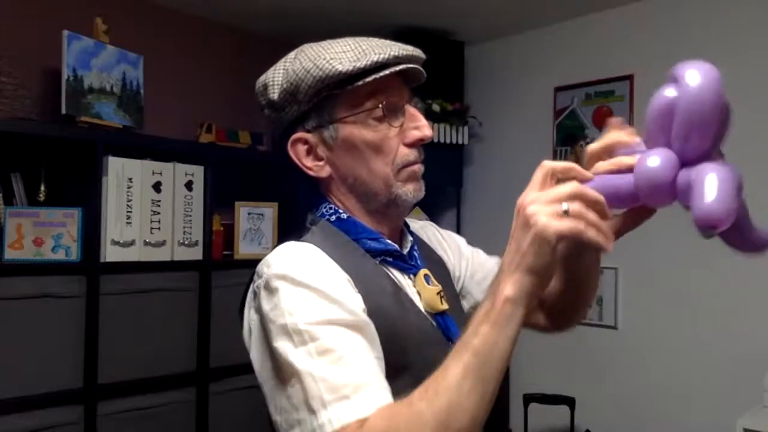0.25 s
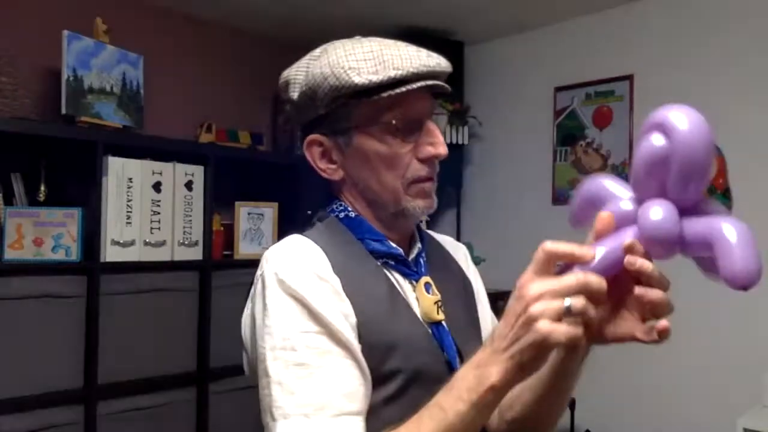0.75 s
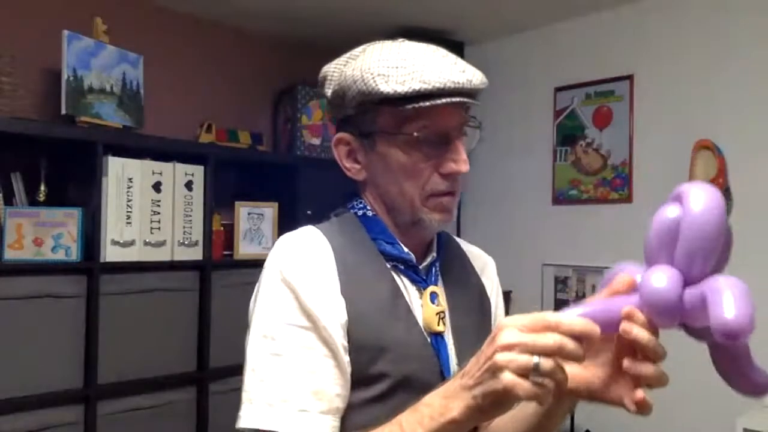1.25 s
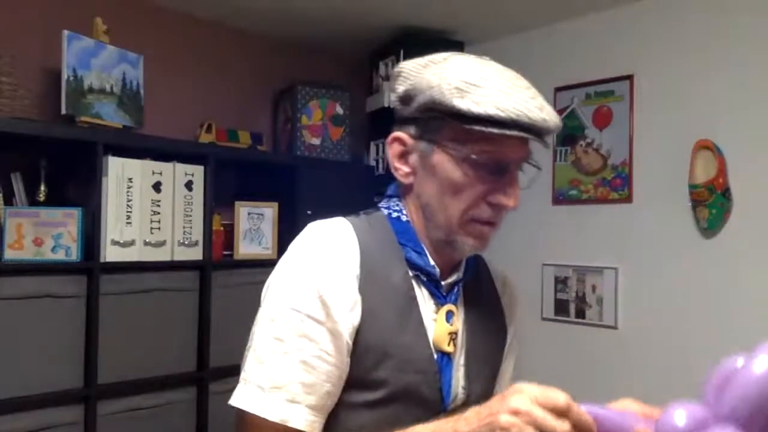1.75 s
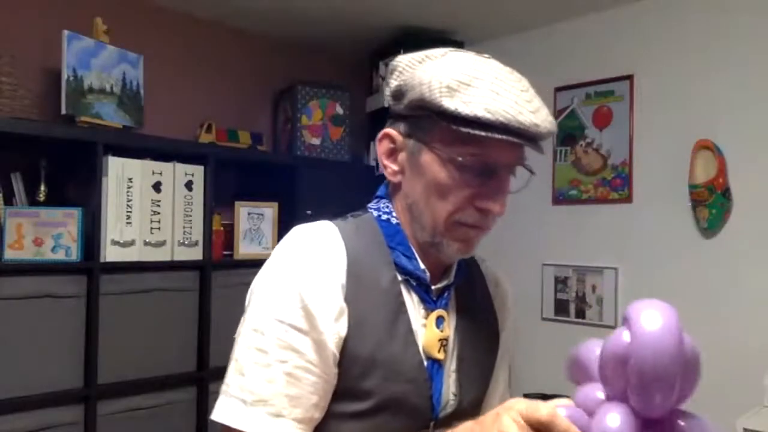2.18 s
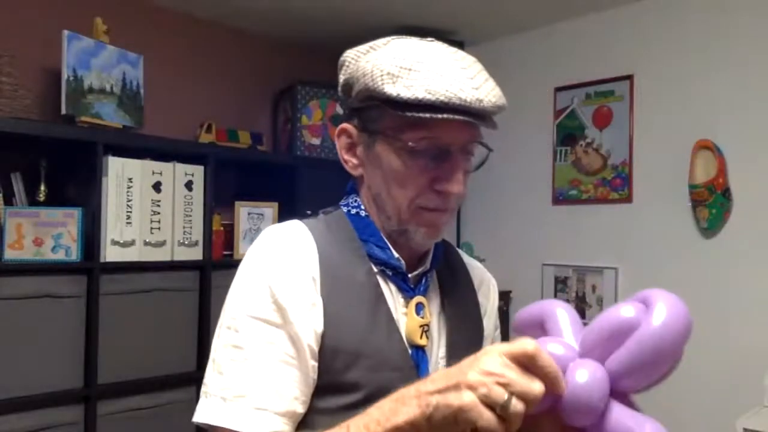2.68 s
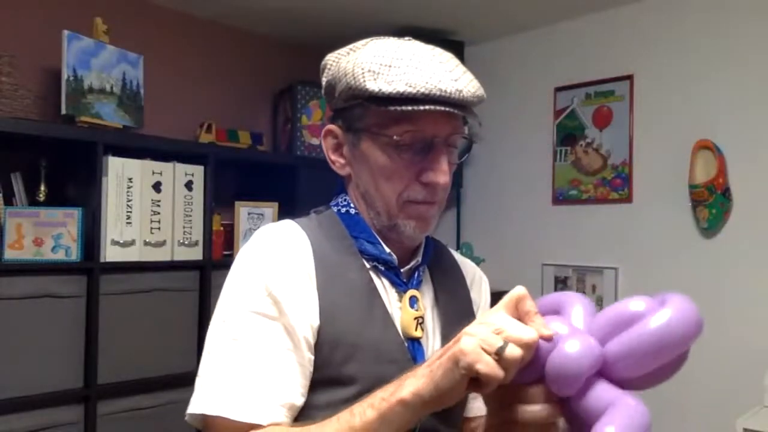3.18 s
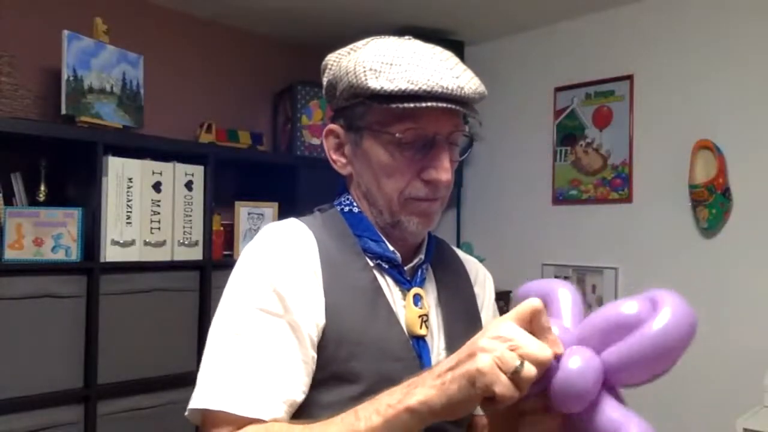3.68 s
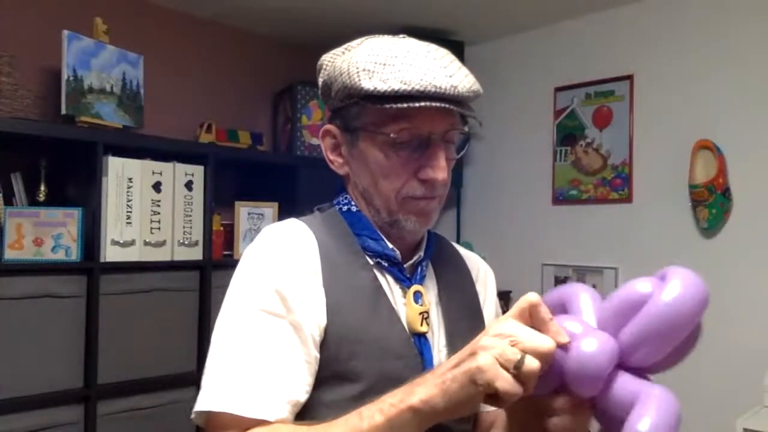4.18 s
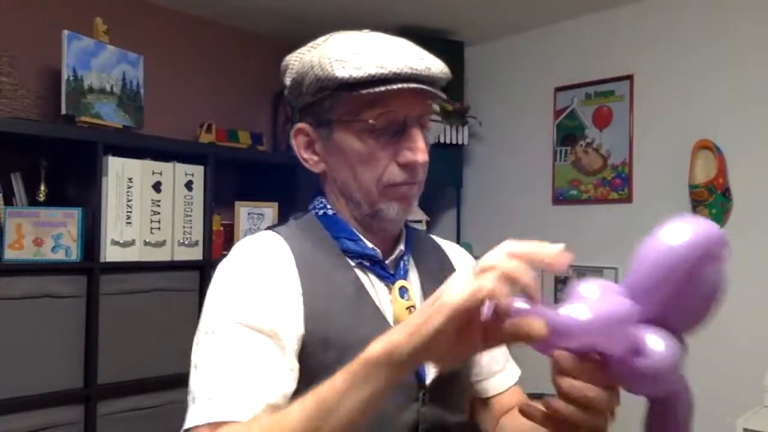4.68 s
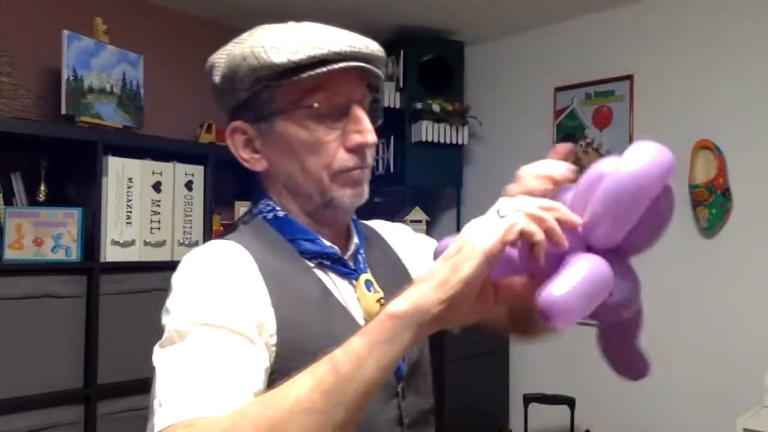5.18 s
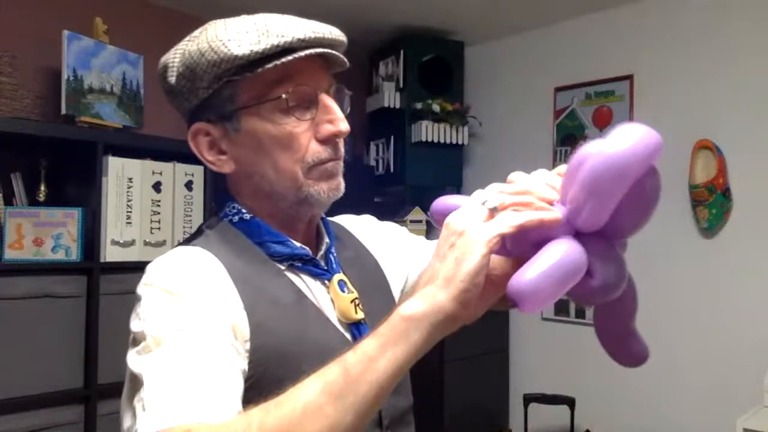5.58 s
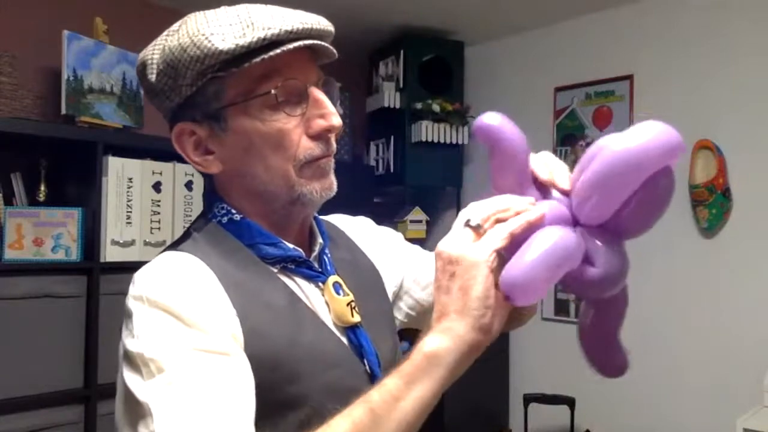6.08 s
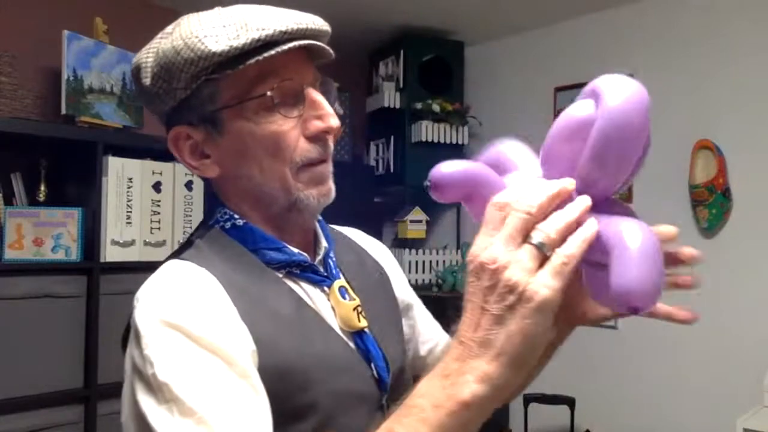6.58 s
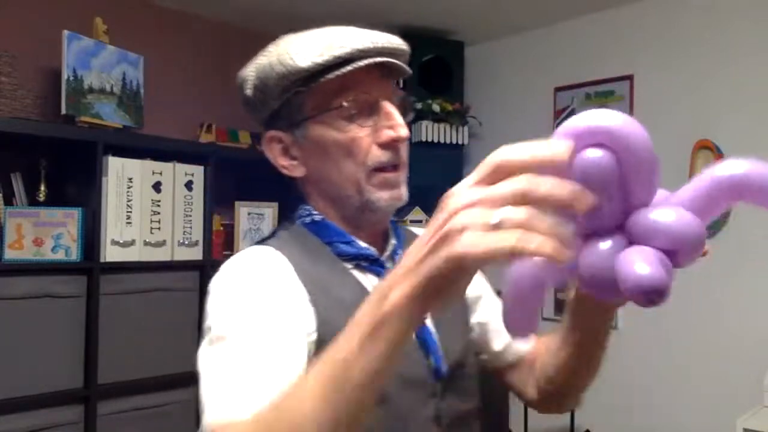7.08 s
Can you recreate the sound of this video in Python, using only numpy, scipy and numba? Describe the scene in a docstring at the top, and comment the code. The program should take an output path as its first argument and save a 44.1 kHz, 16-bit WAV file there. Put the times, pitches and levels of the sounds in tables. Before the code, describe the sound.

Twisted latex balloons squeak and creak in dense, scratchy bursts under gripping hands, with sharp snaps and brief quiet gaps in a small room.

```python
"""In a small room, twisted latex balloons are squeezed and rubbed by hand close to a camera microphone.
The rubber sticks and slips in dense uneven bursts that ring the taut skins and the air inside.
Single grips let go with a snap: a sharp burst of noise. Now and then a bubble rings hollow: a short,
unsteady note. The walls answer softly over a faint room tone. The camera turns quiet bands down and
clips softly; both channels carry the same sound."""
import sys
import numpy as np
from scipy import signal
from scipy.fft import rfft, irfft, next_fast_len
from scipy.io import wavfile
from scipy.ndimage import uniform_filter1d, map_coordinates
from numba import njit

SR = 44100
rng = np.random.default_rng(int(sys.argv[2]) if len(sys.argv) > 2 else 0)


def digitize_waveform(pressure):
    """Quantize a signal to 16-bit integers and store it at the path in sys.argv[1].

    Rows of a 2-D input are taken as channels; values are limited to [-1, 1].
    """
    field = np.atleast_2d(pressure).T
    bounded = np.clip(field, -1, 1)
    quanta = np.round(bounded * 32767).astype(np.int16)
    wavfile.write(sys.argv[1], SR, quanta)


N = 323895

# treble of slips and snaps: (frequency [Hz], level per Hz [dB])
FIZZ = [(4000, -34), (6800, -7), (7680, -12), (8250, -9.5), (9220, -2.5), (12600, 1.5), (15000, 3.5),
        (16000, -9.5)]


def amp(db):
    """Gain of a level in dB."""
    return 10 ** (np.asarray(db) / 20)


def unit(x):
    """Scaled to rms 1."""
    return x / np.sqrt(np.mean(x ** 2) + 1e-20)


def levelled(x):
    """x held near rms 1 over an eighth of a second, so that the stroke alone sets the loudness."""
    power = np.abs(uniform_filter1d(x ** 2, SR // 8))
    return x / np.sqrt(power + 1e-20)


def along(points, hz):
    """Values read between (frequency, value) points on a log frequency axis."""
    f, v = np.transpose(points)
    return np.interp(np.log(hz + 1), np.log(f + 1), v)


def wobble(rate):
    """A smooth random curve with rate random points a second."""
    knots = rng.standard_normal(int(N * rate / SR) + 4)
    return map_coordinates(knots, [np.arange(N) * rate / SR])


def filtered(x, response):
    """x times a complex response of frequency."""
    m = next_fast_len(N + 8192)
    return irfft(rfft(x, m) * response(np.fft.rfftfreq(m, 1 / SR)), m)[..., :N]


def coloured(x, points):
    """x through a filter with this spectrum and energy 1, which never sounds ahead of its input."""
    gain = amp(along(points, np.fft.rfftfreq(2048, 1 / SR)))
    cepstrum = irfft(np.log(gain + 1e-6))
    # folding the second half onto the first makes the filter minimum-phase
    cepstrum[1:1024] *= 2
    cepstrum[1025:] = 0
    h = irfft(np.exp(rfft(cepstrum)))
    return signal.fftconvolve(x, h / np.linalg.norm(h))[:N]


def steep(x, low_hz, high_hz):
    """A causal band-pass: each part of the sound speaks only in its own range."""
    band = signal.butter(3, [low_hz, high_hz], "bandpass", fs=SR, output="sos")
    return signal.sosfilt(band, x)


def strokes():
    """Every rub swells, holds and lets go; overlapping rubs add power, and the strongest lead each pitch."""
    # rubs: (full grip [s], attack [s], hold [s], release [s], squeak [dB], creak [dB], drum [dB],
    # chirp [dB], scratch [dB], taut twist [Hz], long bubble [Hz], enclosed air [Hz])
    rubs = [(0.021, 0.2, 0.022, 0.07, -23, -29, -36, -33, -28.5, 2410, 890, 371),
            (0.131, 0.025, 0.013, 0.056, -36.5, -59.5, -48, -63, -50, 2960, 1120, 304),
            (0.219, 0.03, 0.012, 0.1, -27, -34.5, -82, -31, -38, 2600, 1385, 484),
            (0.278, 0.068, 0.076, 0.033, -20.5, -28, -38.5, -29.0, -25, 2810, 1350, 560),
            (0.333, 0.21, 0.036, 0.054, -30.5, -34, -33.5, -32.5, -82, 2930, 1580, 588),
            (0.637, 0.055, 0.06, 0.094, -35.5, -39.5, -38.5, -36, -31.5, 2660, 1360, 512),
            (0.628, 0.036, 0.049, 0.058, -28, -38.5, -78.0, -77.5, -73.0, 2610, 1370, 480),
            (0.77, 0.013, 0.06, 0.056, -23.5, -29, -53, -32.5, -30, 2400, 1015, 584),
            (0.917, 0.055, 0.01, 0.1, -14, -20.5, -29.5, -23, -20, 2430, 1156, 520),
            (0.996, 0.14, 0.0068, 0.074, -24, -25.5, -32.5, -27.5, -27, 2590, 1175, 520),
            (1.059, 0.058, 0.048, 0.216, -25, -31.5, -37, -30.5, -31, 2680, 1174, 630),
            (1.145, 0.083, 0, 0.095, -27, -23, -30, -36.5, -27.5, 3010, 1060, 610),
            (1.227, 0.22, 0.033, 0.035, -31.5, -39, -40, -35, -34.5, 3330, 1130, 308),
            (1.244, 0.025, 0.04, 0.029, -37, -55, -40.5, -43.0, -77, 3000, 1090, 280),
            (1.365, 0.005, 0.0043, 0.042, -26.5, -80.0, -40.5, -26.5, -35, 3030, 1160, 270),
            (1.431, 0.14, 0.001, 0.13, -23, -29.5, -34.5, -28.5, -28, 3130, 1030, 596),
            (1.546, 0.104, 0.02, 0.02, -28.0, -32.5, -79, -36.0, -40, 3020, 923, 480),
            (1.603, 0.012, 0.0072, 0.086, -18.5, -21.5, -25, -25, -20, 3130, 1244, 530),
            (1.624, 0.28, 0, 0.32, -28.5, -27.5, -37.5, -32.5, -39, 2870, 1110, 590),
            (1.698, 0.109, 0.0086, 0.085, -24.5, -29.0, -29, -32, -24, 2670, 1326, 286),
            (1.84, 0.33, 0.105, 0.083, -39, -79.5, -39, -32.5, -53, 3010, 1160, 358),
            (1.885, 0.098, 0.052, 0.28, -18, -21.5, -31.5, -23, -19.5, 2600, 963, 408),
            (2.076, 0.03, 0.009, 0.02, -25.5, -80.0, -46.5, -23, -20.5, 3040, 1160, 480),
            (2.082, 0.033, 0.11, 0.32, -27.5, -30, -37, -29.5, -25, 2680, 1086, 270),
            (2.398, 0.5, 0.033, 0.039, -28, -33.5, -36.5, -28.5, -23.5, 2630, 1255, 300),
            (2.482, 0.5, 0.023, 0.02, -39.5, -44, -80.0, -49, -54, 2200, 988, 480),
            (2.531, 0.01, 0.008, 0.19, -25, -80.0, -48, -28.5, -15.5, 2950, 1160, 430),
            (2.54, 0.032, 0.094, 0.156, -23.5, -31.5, -53, -25.5, -44, 3100, 1155, 463),
            (2.672, 0.007, 0.01, 0.053, -26.0, -31, -78.5, -28, -34.0, 2320, 1354, 480),
            (2.714, 0.013, 0.0018, 0.058, -15.0, -27.5, -78.5, -48, -21.5, 3110, 1275, 480),
            (2.748, 0.057, 0.033, 0.099, -7, -20, -37.5, -14, -11, 3000, 1227, 530),
            (2.864, 0.14, 0.13, 0.067, -25.5, -26.5, -45.5, -32, -43.5, 2640, 1370, 338),
            (2.972, 0.048, 0.011, 0.057, -26, -29.5, -53, -25, -27, 2690, 1280, 480),
            (3.088, 0.029, 0.055, 0.02, -66.5, -80.0, -74, -66.5, -44, 2660, 1160, 340),
            (3.135, 0.029, 0.019, 0.04, -27.0, -35.0, -40.5, -36.5, -32.5, 2380, 1492, 350),
            (3.253, 0.083, 0.027, 0.062, -45, -39, -74, -57, -46.5, 2750, 1410, 600),
            (3.363, 0.048, 0.01, 0.038, -44.5, -46, -59.5, -53.5, -36.0, 2250, 1458, 270),
            (3.478, 0.054, 0.022, 0.05, -31.0, -31.5, -44.5, -34, -27.5, 1980, 1290, 506),
            (3.567, 0.083, 0.009, 0.056, -29.0, -31, -47.5, -48, -32, 1940, 1450, 350),
            (3.651, 0.025, 0.029, 0.035, -29.5, -38, -73.5, -36, -30, 2840, 1400, 480),
            (3.709, 0.005, 0.0055, 0.026, -42.0, -80.0, -78, -41, -28, 2930, 1160, 480),
            (3.731, 0.091, 0.00071, 0.042, -30.5, -45.5, -61.5, -48, -36.5, 2030, 1480, 350),
            (3.754, 0.059, 0.0015, 0.061, -45.5, -54.0, -52, -56, -80.0, 2090, 1450, 280),
            (3.817, 0.024, 0.009, 0.02, -34.5, -54, -67, -41, -29, 3340, 1524, 410),
            (3.856, 0.037, 0.012, 0.023, -28.5, -47.5, -55, -28, -22, 2710, 1408, 400),
            (3.86, 0.005, 0.031, 0.094, -22.5, -28, -40.5, -31.0, -18, 2130, 1470, 330),
            (3.929, 0.012, 0.11, 0.17, -24.5, -26, -49.5, -30.5, -28, 2170, 1415, 646),
            (3.95, 0.01, 0.015, 0.069, -15, -22.5, -32, -17.5, -7, 2650, 1020, 360),
            (4.101, 0.02, 0.022, 0.029, -24.5, -31, -61, -31.5, -26.5, 2280, 1337, 430),
            (4.174, 0.0099, 0.00064, 0.056, -14, -26, -71, -21.5, -22.5, 3340, 1512, 420),
            (4.276, 0.039, 0.092, 0.03, -18, -20.0, -49, -21.5, -19, 2720, 1220, 318),
            (4.335, 0.061, 0.096, 0.067, -24.5, -26, -32.5, -46, -50, 2850, 1188, 540),
            (4.417, 0.028, 0.049, 0.077, -80.0, -33.5, -41, -80.0, -54, 2830, 1010, 510),
            (4.586, 0.6, 0.034, 0.11, -59, -64, -65.5, -62.5, -58.5, 2670, 1122, 569),
            (4.783, 0.027, 0.054, 0.037, -61, -80.0, -50.5, -64.5, -53.5, 2820, 1160, 191),
            (4.869, 0.11, 0.098, 0.02, -52, -78.5, -41.5, -78.0, -78.5, 2730, 1160, 370),
            (4.88, 0.018, 0.01, 0.047, -27.5, -28, -32.5, -40, -29.5, 3100, 900, 450),
            (4.911, 0.085, 0.07, 0.06, -38.5, -38.5, -46, -44.0, -40.5, 3430, 1010, 390),
            (4.922, 0.041, 0, 0.056, -23, -27.5, -26.0, -30.5, -24.5, 2870, 1460, 350),
            (5.283, 0.041, 0.0068, 0.12, -37, -38.5, -39, -47.0, -37.5, 2340, 1200, 170),
            (5.382, 0.0059, 0.056, 0.094, -25.0, -30, -30.5, -29, -24.5, 2720, 1075, 588),
            (5.572, 0.2, 0.061, 0.02, -35, -38.0, -40, -40.5, -33.5, 2400, 1100, 500),
            (5.635, 0.013, 0.0059, 0.11, -33.5, -39, -35, -42, -29, 2420, 1030, 384),
            (5.694, 0.096, 0.013, 0.094, -32, -34.5, -34.5, -37.5, -30.5, 2680, 1100, 590),
            (5.748, 0.046, 0.01, 0.11, -33, -36.5, -36, -37.0, -28, 2310, 1120, 312),
            (5.824, 0.076, 0.0, 0.38, -27.0, -29.0, -27.5, -33, -25, 2480, 1140, 282),
            (6.052, 0.29, 0.009, 0.14, -19.5, -26, -28, -26, -19, 2480, 1277, 428),
            (6.178, 0.14, 0.1, 0.076, -21.5, -27.5, -28.5, -27.5, -19.5, 2640, 1280, 326),
            (6.31, 0.027, 0.075, 0.081, -45.5, -46.5, -52, -54, -81, 2860, 1110, 320),
            (6.486, 0.096, 0.009, 0.059, -49, -47.5, -52, -59, -50, 2380, 1124, 300),
            (6.562, 0.005, 0.033, 0.123, -62, -72, -77, -71, -62, 2010, 1535, 477),
            (6.622, 0.006, 0.0011, 0.044, -74, -74.0, -78.0, -53.5, -51.5, 2830, 1290, 480),
            (6.803, 0.03, 0.027, 0.02, -64, -67.5, -78, -80.0, -58, 2450, 1070, 476),
            (6.862, 0.021, 0.0, 0.087, -27.0, -27.5, -34, -33.5, -29.0, 2350, 1400, 560),
            (6.964, 0.026, 0.09, 0.043, -44, -52.5, -59, -42, -49.0, 2510, 1460, 600),
            (6.98, 0.047, 0.021, 0.065, -39, -46, -50.5, -45, -37.0, 2350, 1360, 560),
            (7.142, 0.021, 0.052, 0.048, -48.5, -64.5, -69, -61.5, -67, 2090, 1590, 596),
            (7.19, 0.0067, 0.0, 0.61, -46.5, -55, -44, -66.0, -53, 2100, 1470, 336),
            (7.237, 0.019, 0.037, 0.084, -35, -42, -45, -41.5, -35.0, 2780, 1330, 330),
            (7.3, 0.028, 0.009, 0.15, -34, -33, -49, -45.0, -34.5, 1990, 990, 503)]
    # how fast the pitches sag as a rub goes on: twist, bubble, air [octaves per second]
    sag = [0.36, 0.71, 0.22]
    swing_db = 30  # gained over an attack time, lost over a release time
    steps_per_s = 500
    air_lag_s = 0.0049  # the enclosed air answers late

    t = np.arange(0, N / SR + .1, 1 / steps_per_s)
    rows = np.array(rubs)[:, :, None]
    grip, hold = rows[:, 0], np.abs(rows[:, 2])
    attack, release = np.abs(rows[:, 1]) + 1e-3, np.abs(rows[:, 3]) + 1e-3

    # how far each rub lies below its full level at each moment
    away = np.maximum((grip - t) / attack, (t - grip - hold) / release)
    under_db = swing_db * np.clip(away, 0, 8)
    power = amp(2 * (rows[:, 4:9] - under_db[:, None]))

    since_grip = np.clip(t - grip, -.2, .3)[:, None]
    sagged = rows[:, 9:] * 2 ** (-np.c_[sag] * since_grip)
    # squared power lets the strongest rub lead the squeak, creak and drum pitches
    weight = power[:, :3] ** 2
    twist_hz, bubble_hz, air_hz = (weight * sagged).sum(0) / weight.sum(0)

    squeak, creak, drum, chirp, scratch = np.sqrt(power.sum(0))
    now = np.arange(N) / SR
    soon = lambda curve: np.interp(now, t, curve)
    late = lambda curve: np.interp(now - air_lag_s, t, curve)
    return (soon(squeak), soon(creak), late(drum), soon(chirp), soon(scratch),
            soon(twist_hz), soon(bubble_hz), late(air_hz))


def slips(rate, spread_db, hiss):
    """Uneven stick-slip jerks, a few far larger than the rest, over sliding hiss."""
    passed = np.cumsum(rate * amp(4 * wobble(25))) / SR
    when = np.flatnonzero(np.diff(np.floor(passed)))  # one jerk at each whole count
    size = amp(spread_db * np.minimum(rng.exponential(size=N), 4))
    direction = rng.choice([-1, 1], N)
    jerks = np.zeros(N)
    jerks[when] = size[when] * direction[when]
    share = np.clip(hiss, 0, 1)  # of the power
    return np.sqrt(1 - share) * unit(jerks) + np.sqrt(share) * rng.standard_normal(N)


def ringing(force, modes, shift_db, favour_db=lambda hz: 0):
    """The grip wanders over the rubber, so each mode is driven now harder, now softer."""
    ring = np.zeros(N)
    for k, (hz, width, db) in enumerate(modes):
        drive = force * amp(db + shift_db * wobble(14) + favour_db(hz))
        b, a = signal.iirpeak(hz, hz / width, SR)
        ring += (-1) ** k * signal.lfilter(b, a, drive)
    return levelled(ring)


@njit
def resonate(force, turn, radius):
    """A two-pole resonance whose pitch (radians a sample) moves."""
    out = np.zeros(len(force))
    for i in range(2, len(force)):
        push = force[i] - force[i - 2]
        out[i] = push + 2 * radius[i] * np.cos(turn[i]) * out[i - 1] - radius[i] ** 2 * out[i - 2]
    return out


def gliding(force, hz, sharpness):
    """Squeezing stretches the rubber: the resonance follows the tension."""
    turn = 2 * np.pi * hz / SR
    radius = np.exp(-np.pi * hz / sharpness / SR)
    return levelled(resonate(force, turn, radius))


def rubbing():
    """One train of slips drives skins, necks, bubbles, enclosed air and the dry treble scratch."""
    # skins of the twists: (frequency [Hz], width [Hz], drive [dB])
    skin_modes = [(1710, 100, 4.5), (1830, 63, 11.5), (2094, 110, -5.5), (2308, 140, 4), (2328, 100, 2),
                  (2653, 180, 2.5), (2900, 58, -7), (2985, 140, -1), (3130, 110, -2.5), (3488, 78, 3.5),
                  (3630, 92, 1.5), (3833, 100, -2)]
    # pinched necks: (frequency [Hz], width [Hz], drive [dB])
    neck_modes = [(4306, 560, 0.5), (4826, 220, 4.5), (5270, 300, 1), (5890, 460, 0), (6180, 330, -2)]
    *gains, taut_hz, bubble_hz, air_hz = strokes()
    force = slips(900, spread_db=4.5, hiss=0.42)  # about 900 slips a second

    # skin modes near the taut twist's pitch lead
    near = lambda hz: -9 * np.minimum(np.abs(np.log2(hz / taut_hz)), 1.5)
    skins = ringing(force, skin_modes, 7, near)
    twist = gliding(force, taut_hz, 2.4)
    squeak = levelled(steep(skins + amp(0.5) * twist, 1700, 4200))

    necks = ringing(force, neck_modes, 3.4)
    chirp = levelled(steep(necks + amp(-4.5) * force, 3900, 6300))

    bubble = gliding(force, bubble_hz, 5.7)
    # two broad resonances in a row fill in above the bubble's pitch
    upper = gliding(gliding(force, 1.13 * bubble_hz, 0.99), 1.15 * bubble_hz, 0.8)
    creak = levelled(steep(bubble + amp(-3.5) * upper, 770, 1700))

    air = gliding(force, air_hz, 11)
    broad_air = gliding(force, air_hz, 0.81)
    drum = levelled(steep(air + amp(2.5) * broad_air, 100, 940))

    scratch = coloured(force * amp(2.72 * wobble(60)), FIZZ)
    parts = (squeak, creak, drum, chirp, scratch)
    return sum(gain * part for gain, part in zip(gains, parts))


def hollow():
    """A bubble rings on its own: short notes of wandering strength and phase that swell and fade."""
    # hollow notes: (start [s], length [s], level [dB], pitch [Hz])
    bubble_notes = [(0.01, 0.061, -34.5, 866), (0.039, .06, -42, 359), (0.11, .07, -48.5, 350),
                    (0.328, 0.071, -37, 334), (0.677, .06, -39, 310.6), (0.766, 0.065, -31.5, 1002),
                    (0.924, 0.049, -28, 510), (1.1, 0.056, -26, 1028), (1.243, 0.073, -38.5, 274),
                    (1.346, 0.046, -40.5, 275), (1.406, .05, -32, 1024), (1.585, .05, -33, 520),
                    (1.68, .06, -43, 250), (1.873, 0.096, -29, 950), (2.08, 0.12, -39, 270),
                    (2.859, 0.062, -48, 190), (3.109, 0.074, -40, 348.5), (3.72, .08, -54, 285),
                    (4.39, 0.084, -38, 502.7), (4.908, 0.037, -36.5, 350), (5.254, 0.065, -42.5, 163.4),
                    (5.409, .04, -37, 590)]
    wavers_hz = 60  # random points a second in the wandering
    t, notes = np.arange(N) / SR, np.zeros(N)
    unsteady = 1 + 1.1 * (wobble(wavers_hz) + 1j * wobble(wavers_hz))
    for s, length, db, hz in bubble_notes:
        on = slice(round(s * SR), round((s + length) * SR))
        swell = np.sin(np.pi * (t[on] - s) / length)
        tone = np.real(unsteady[on] * np.exp(2j * np.pi * hz * t[on]))
        notes[on] += np.sqrt(2) * amp(db) * swell * tone
    return notes


def snaps():
    """Each release is a sharp jerk and a moment of tearing, with a low thump that is stronger with its treble."""
    # grips that let go: (time [s], level before a common 15 dB cut [dB], treble against the body [dB])
    releases = [(0.1656, -34, -8), (0.5964, -38.5, 5.5), (0.6272, -22.5, -14), (0.7669, -19, -8.5),
                (0.7702, -17.5, -7), (0.7754, -15.5, -5), (0.7871, -17, -12), (0.7974, -12, -12),
                (0.8143, -14.5, -9), (0.8252, -15.5, -9), (0.8308, -12, -9), (0.8686, -14.5, -14.5),
                (0.8937, -4, -15.5), (0.9025, -8, -10), (0.913, -6, -10), (1.053, -18, -6),
                (1.2776, -26.5, -15.5), (1.3981, -13, -11), (1.4091, -12, -10), (1.4195, -7, -10),
                (1.5918, -14.5, -12.5), (1.5968, -5.5, -2), (1.6043, -6.5, 0), (2.0737, -9.5, 9.5),
                (2.079, -12, 2), (2.084, -8, 3.5), (2.1657, -11.5, 2), (2.2604, -21, 3),
                (2.2748, -18.5, -2), (2.283, -25, 5), (2.3849, -15.5, 13.5), (2.5268, -2.5, 2.5),
                (2.5375, -6.5, 11.5), (2.6112, -8.5, -2.5), (2.626, -2.5, -2.5), (2.7112, -4, -8.0),
                (2.7163, -6.5, -4), (2.9055, -12, -22), (2.9174, -10.5, -18), (2.9603, -12.5, -11),
                (2.9636, -6.5, -7.5), (3.464, -24, 0), (3.645, -24, 3), (3.7088, -32.5, 8.5),
                (3.8519, -17.5, 10.5), (3.858, -7, 8.5), (3.948, -8, 2), (4.172, -14, -6), (4.263, -16, -3),
                (4.425, -20, -26), (4.5047, -41.5, 2.5), (4.7796, -51.5, 18), (4.8645, -21.5, 7.5),
                (4.8779, -9.5, 7), (4.8828, -17.5, -2), (4.9135, -11.5, -6.5), (4.9247, -4.5, -10),
                (4.9311, -12, -1.5), (4.936, -11.5, 2), (4.9657, -16.5, -6), (5.283, -22.5, -16.5),
                (5.3814, -24, 9.5), (5.387, -9, 6), (5.7968, -17.5, 3), (5.81, -20, 0), (6.4457, -43, 3.5),
                (6.45, -37, -8), (6.594, -51, -9), (6.6205, -45, 17.5), (6.8641, -17, 1),
                (6.9505, -34, 6.5), (6.963, -30, 3), (7.1399, -48.5, -26.0), (7.1454, -47, -31),
                (7.187, -31, -23.0), (7.285, -20.5, 4.5), (7.31, -23.5, -4.5), (7.319, -21.5, 3.5),
                (7.3366, -27, 3.5)]
    # body of a snap: (frequency [Hz], level per Hz [dB])
    body_colour = [(760, -30), (1300, -5.5), (1820, -4), (2720, 1.5), (3180, 2), (3940, 1), (4890, -7),
                   (8200, -28.5), (10700, -34), (18000, -120)]
    tear_t60_s = .006  # time for the tearing to fall by 60 dB
    body, treble = np.zeros(N + SR), np.zeros(N + SR)
    t = np.arange(SR // 100) / SR
    for s, db, treble_db in releases:
        tearing = amp(-60 * t / tear_t60_s) * rng.standard_normal(len(t))
        burst = unit(tearing) * amp(db - 15)
        on = slice(round(s * SR), round(s * SR) + len(t))
        body[on] += burst
        treble[on] += burst * amp(treble_db)
    body, treble = body[:N], treble[:N]
    # making every swing positive leaves a low pulse, as an overloaded microphone gives
    thump = steep(np.abs(treble), 35, 350)
    return coloured(body, body_colour) + coloured(treble, FIZZ) + amp(-21.0) * thump


def room(x):
    """The walls answer with a noise tail in which each frequency dies at its own speed."""
    # how long the walls' answer lasts: (frequency [Hz], time to fall by 60 dB [s])
    decay = [(200, 0.13), (2000, 0.039), (10000, 0.15)]
    hz, t, z = signal.stft(rng.standard_normal(SR // 3), SR, nperseg=256)
    fading = amp(-60 * t / along(decay, hz)[:, None])
    tail = signal.istft(z * fading, SR, nperseg=256)[1]
    delayed = np.pad(x, (150, 0))  # samples before the first answer
    return signal.fftconvolve(delayed, tail / np.linalg.norm(tail))[:N]


def room_tone():
    """The room's steady hush is noise with a fixed spectrum."""
    # room tone: (frequency [Hz], level per Hz [dB])
    hush = [(35, -48), (60, -26), (924, -9), (1280, -8.5), (2090, -5), (7230, -18), (16000, -24.5)]
    return coloured(rng.standard_normal(N), hush)


def scene():
    """Balloons, their room and its hush, at one microphone."""
    balloons = rubbing() + hollow() + snaps()
    mono = balloons + amp(-10.5) * room(balloons) + amp(-71.5) * room_tone()
    return np.array([mono, mono])


def record(dry):
    """A suppressor pulls down every band that is quiet; peaks clip softly; bass and top are cut."""
    top_hz = 15750
    z = signal.stft(dry, nperseg=512)[2]
    # power smoothed over neighbouring bands, then over time
    power = uniform_filter1d(np.abs(z) ** 2, size=5, axis=1)
    power = uniform_filter1d(power, size=3, axis=2)
    level_db = 10 * np.log10(np.abs(power) + 1e-16)
    cut_db = np.clip(.5 * (level_db + 70.5), -18, 0)
    gated = signal.istft(z * amp(cut_db), nperseg=512)[1][:, :N]
    clipped = gated / (1 + np.abs(gated / 0.77) ** 6) ** (1 / 6)
    return filtered(clipped, lambda hz: (hz < top_hz) * (1j * hz / (70 + 1j * hz)) ** 2)


dry = scene()
out = record(dry)
digitize_waveform(out)
```